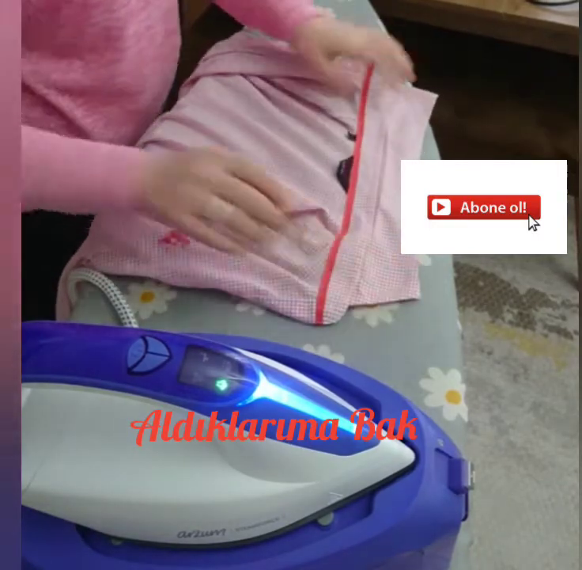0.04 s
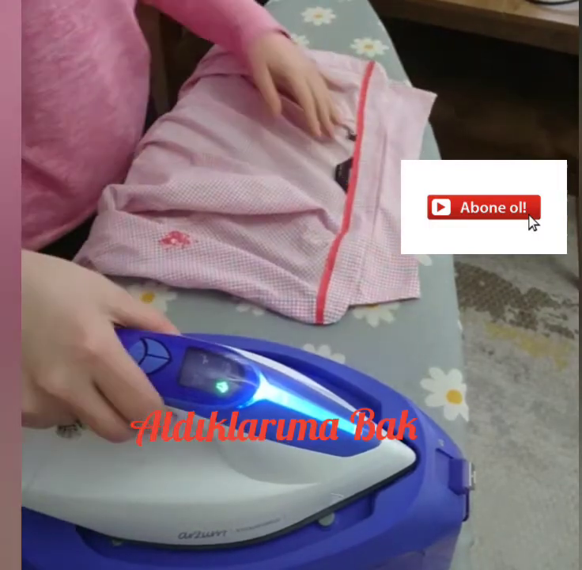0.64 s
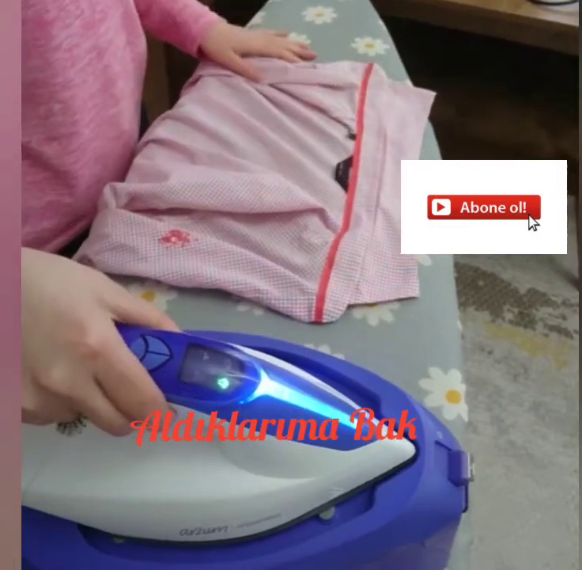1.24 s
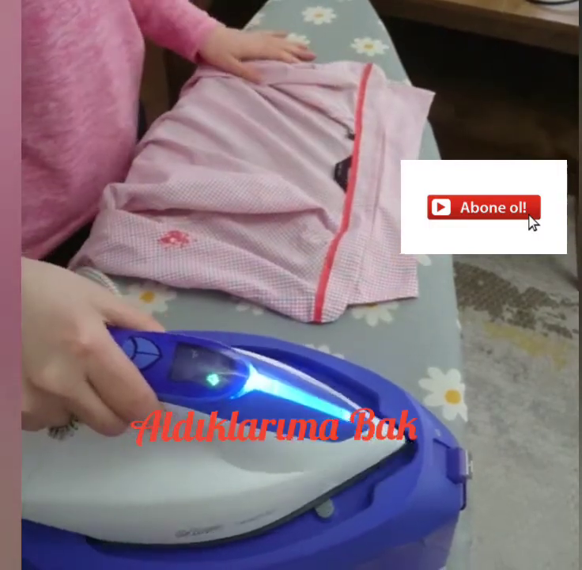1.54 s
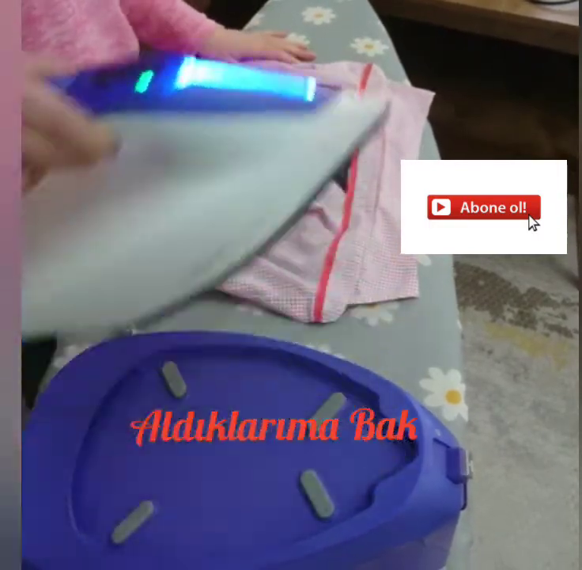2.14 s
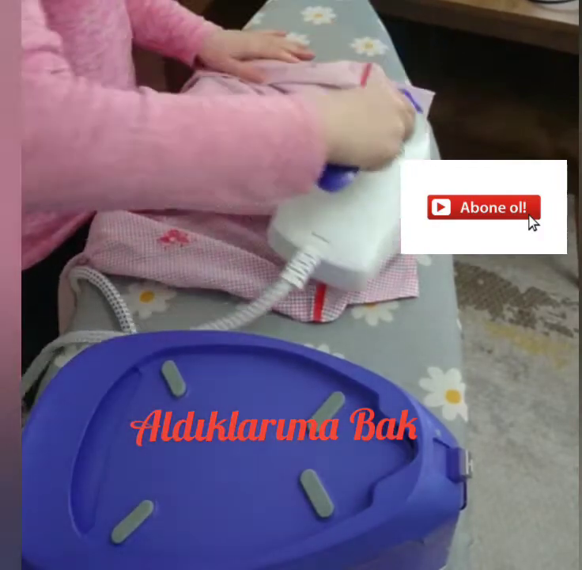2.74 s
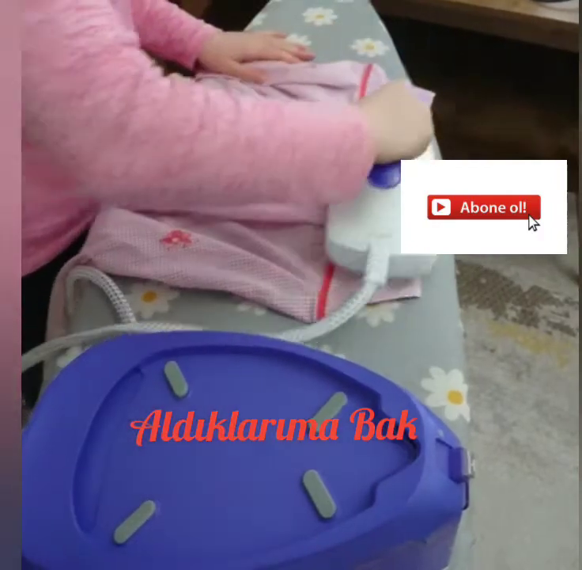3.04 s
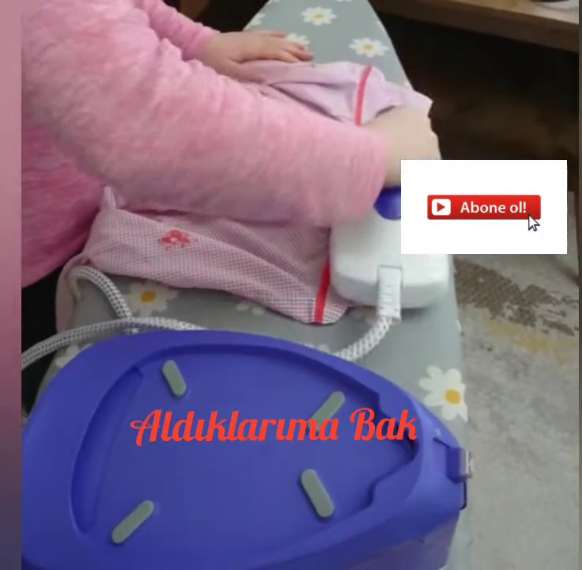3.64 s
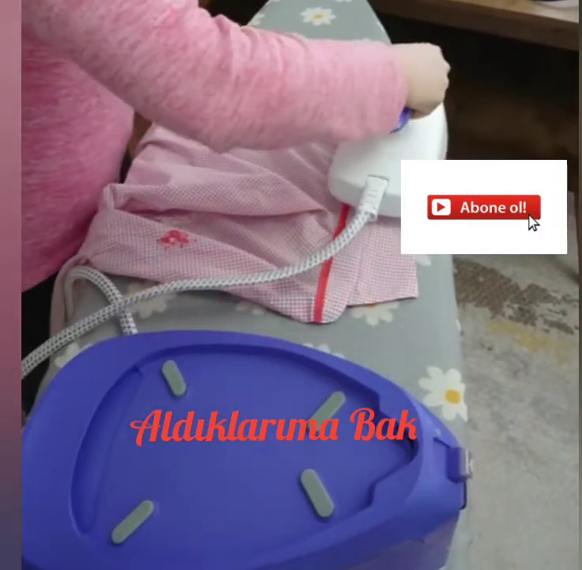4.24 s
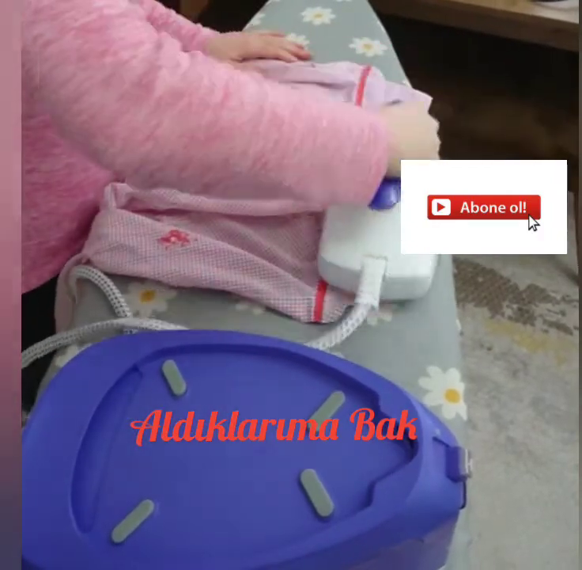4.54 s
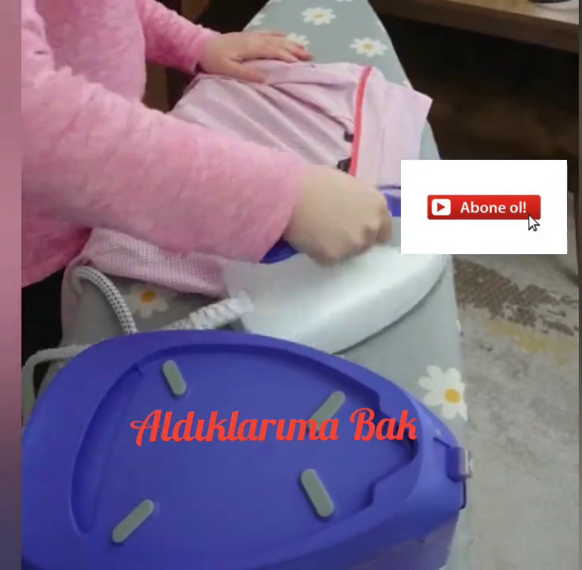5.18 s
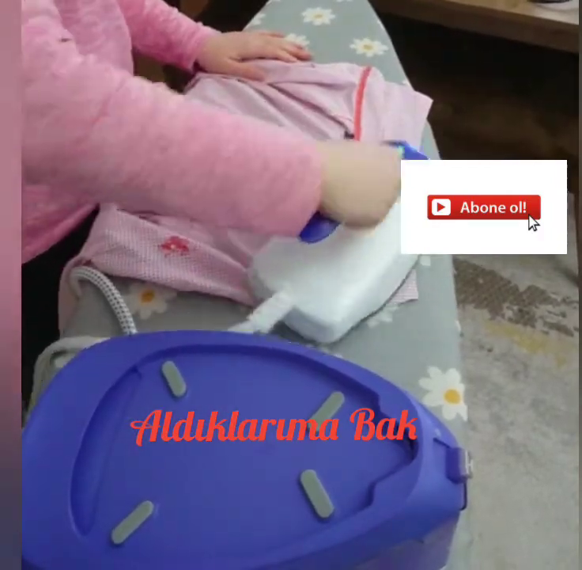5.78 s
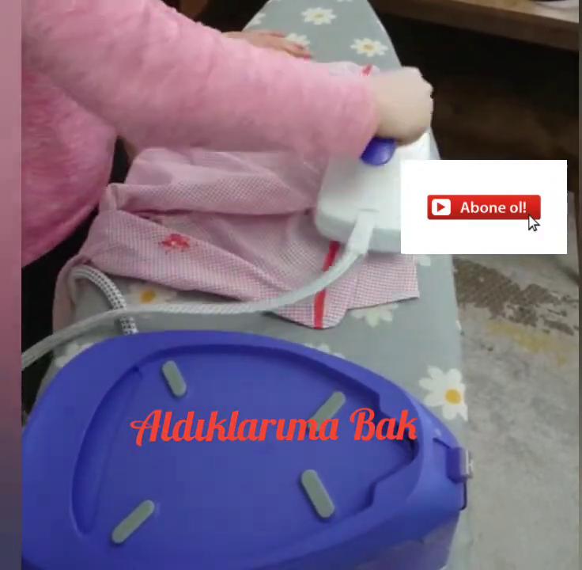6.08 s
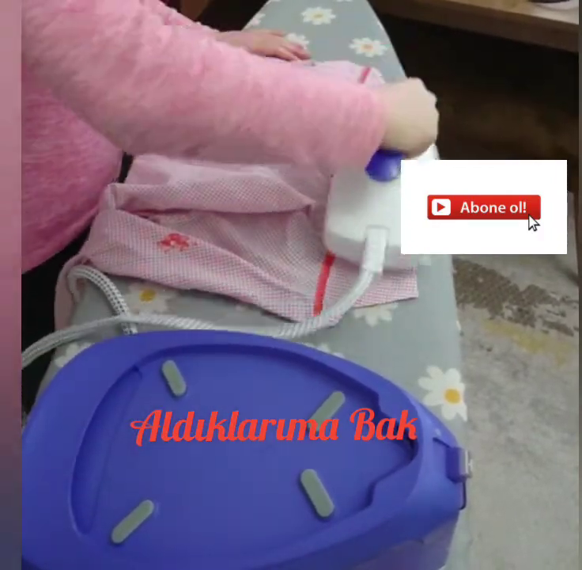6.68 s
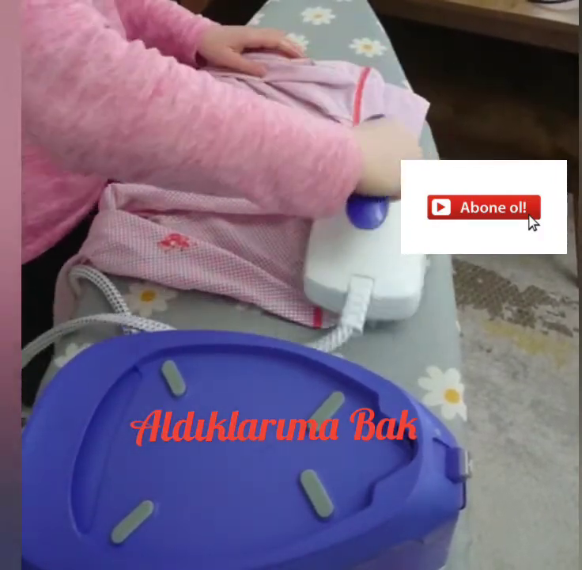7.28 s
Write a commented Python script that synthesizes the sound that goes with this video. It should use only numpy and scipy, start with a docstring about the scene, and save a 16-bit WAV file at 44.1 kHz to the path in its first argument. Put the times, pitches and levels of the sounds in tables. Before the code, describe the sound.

A steady low hush with a faint whirr fills a small room, and everything is heard from close by. From about 0.4 seconds a hand brushes cloth and grips a steam iron, making light clicks, dull taps and a hollow plastic knock. A switch snaps at 1.2 seconds. Between 1.6 and 1.9 seconds the iron jerks out of its plastic base with a short rubbery judder, the loudest moment, amid scrapes, rattles and knocks. From 2.6 seconds it glides back and forth over a shirt in soft swishes, while the ironing board rumbles faintly. Dull bumps come around 3.0, 3.7 and 4.6 seconds, mixed with small handle clicks. At 5.3 seconds the iron lands with a firm knock and a low board thump. Several light clicks follow between 6.3 and 6.7 seconds, then soft bumps near 6.8 and 7.2 seconds as the strokes continue.

```python
"""Ironing a shirt

A steam iron is gripped, worked loose from its hollow plastic base and pushed to and fro over a shirt.
Plastic knocks and small clicks sound over the swish of the soleplate; the board thumps on its legs.
A small room with a steady low hush, heard from close by through two microphone ports."""
import sys
import numpy as np
from scipy import signal
from scipy.fft import rfft, irfft, next_fast_len
from scipy.io import wavfile

SR = 44100
rng = np.random.default_rng(int(sys.argv[2]) if len(sys.argv) > 2 else 0)


def digitize_waveform(pressure):
    """Quantize a signal to 16-bit integers and store it at the path in sys.argv[1].

    Rows of a 2-D input are taken as channels; values are limited to [-1, 1].
    """
    field = np.atleast_2d(pressure).T
    bounded = np.clip(field, -1, 1)
    quanta = np.round(bounded * 32767).astype(np.int16)
    wavfile.write(sys.argv[1], SR, quanta)


N = 327079
TIME = np.arange(N) / SR
AGE = TIME[:SR * 2 // 5]   # time since an onset [s]
GIVE_S = 0.0054   # delay from a blow to the board's thump

# iron on its base: (time [s], body [dB], pitch [Hz], t60 [s], crack [dB], crack top [Hz],
# pan L-R [dB], settling [dB re body], board thump [dB])
KNOCKS = [(.622, -39.5, 430, .03, -32.5, 1050, 0, -11, -40.5),
          (.777, -49, 340, 0.033, -53, 1000, -4, 0, -39),
          (1.584, -51.5, 890, 0.046, -51, 6000, -5, -14, -35),
          (1.635, -36.5, 590, 0.034, -38.5, 1900, -0.5, -14, -51),
          (1.666, -38.5, 470, 0.072, -33.5, 1900, -1, -9, -23),
          (1.777, -52, 645, .015, -52, 1500, -3, -11, -55),
          (1.797, -40.5, 1280, 0.041, -32, 4140, -7.5, -20, -33),
          (1.803, -36, 440, 0.075, -43, 1200, -2, -5.5, -50),
          (1.872, -45.5, 620, 0.04, -42, 2000, -17, -9, -47),
          (1.888, -31.5, 794, 0.024, -28.5, 5000, -8, -11.5, -19.5),
          (1.893, -36.5, 222.6, 0.13, -54, 900, -2, -11, -57),
          (1.908, -43.5, 410, 0.042, -38, 5000, -8, -11, -65)]
# iron on the padded board: columns as KNOCKS
BUMPS = [(3.037, -62, 710, 0.012, -53, 1500, 3, -13, -42), (3.077, -57, 390, .03, -57, 1200, -3, 0, -28.5),
         (3.105, -43, 423, 0.043, -39, 990, 0, -6.5, -53),
         (3.674, -34, 507, 0.041, -36.5, 1300, -8, -3, -46),
         (3.798, -50, 344, 0.025, -48, 1100, 4, -2.5, -37), (4.603, -42, 416, 0.02, -46, 900, -2, -4, -42),
         (5.347, -25, 500, 0.034, -30, 4800, -3.5, -4, -16.5),
         (5.359, -36, 242, 0.015, -44, 700, 0, -17.5, -48),
         (6.837, -38.5, 454, 0.028, -41, 990, -2, -4.5, -56),
         (7.188, -45, 357, 0.022, -43.5, 1290, 4, -11, -46)]
# modes of the hollow plastic: (frequency [Hz], level [dB], t60 [s])
SHELL_MODES = [(220.8, 0, 0.2), (285, -2, 0.21), (377, 0, 0.025), (410.6, 0, 0.078), (463, -5.5, 0.088),
               (570, -9.5, 0.054), (609.4, -12.5, 0.29), (692, -11.5, 0.24), (764.7, -9.5, 0.21),
               (975, -19.5, 0.31), (1037, -1, 0.058), (1415, -13, 0.091), (1736, -11, 0.091),
               (3185, -8.5, 0.071)]
# hand, then soleplate, over the cloth: (start [s], length [s], peak swish [dB], peak sway [dB])
STROKES = [(0.422, 0.57, -63.5, -52), (0.9, 0.68, -71.5, -59.5), (1.564, 0.11, -55.5, -70),
           (2.587, 0.48, -64.5, -84), (2.841, 0.64, -60.5, -58.5), (3.469, 0.37, -59.5, -58),
           (3.802, 0.27, -67.5, -53), (3.883, 0.43, -64.5, -81), (4.318, 0.59, -61, -69),
           (4.803, 0.78, -61.5, -66), (5.705, 0.64, -59.5, -63.5), (6.22, 0.37, -62.5, -55),
           (6.515, 0.71, -60, -61.5), (7.172, 0.28, -62.5, -71)]


def from_db(db):
    return 10 ** (np.asarray(db) / 20)


def at_hz(points, hz):
    """Interpolate a table over log frequency."""
    table_hz, value = np.transpose(points)
    return np.interp(np.log(np.maximum(hz, 1)), np.log(table_hz), value)


def rms_one(x, first_s=None):
    """Scale to rms 1, overall or over the first first_s."""
    head = x if first_s is None else x[..., :int(first_s * SR)]
    return x / np.sqrt(np.mean(head ** 2) + 1e-20)


def fade(t60_s):
    return np.exp(-np.log(1000) * AGE / t60_s)


def swell(time_s, peak_db, rise_db_per_s, fall_db_per_s):
    """Gain that climbs to a peak at time_s, then dies away."""
    drop_db = np.maximum((time_s - TIME) * rise_db_per_s, (TIME - time_s) * fall_db_per_s)
    return from_db(peak_db - np.minimum(drop_db, 200))


def panned(x, pan_db):
    """Constant-power pan; pan_db is left minus right."""
    return x * from_db(np.array([[.5], [-.5]]) * pan_db) / np.sqrt(np.cosh(pan_db * np.log(10) / 20))


def add(track, time_s, sound):
    start = int(time_s * SR)
    track[:, start:start + sound.shape[1]] += sound[:, :N - start]


def butter(x, hz, kind):
    return signal.sosfilt(signal.butter(2, hz, kind, fs=SR, output="sos"), x)


def colour(x, spectrum):
    """Minimum-phase filter from (frequency [Hz], gain [dB]) points."""
    size = 2 * next_fast_len(x.shape[-1] // 2 + SR // 20)
    gain = from_db(at_hz(spectrum, np.arange(size // 2 + 1) * SR / size))
    cepstrum = irfft(np.log(gain))
    cepstrum[1:size // 2] *= 2
    cepstrum[size // 2 + 1:] = 0
    return irfft(rfft(x, size) * np.exp(rfft(cepstrum)))[..., :x.shape[-1]]


def noise(size, correlation):
    """Stereo white noise."""
    mid, side = rng.standard_normal((2, size))
    return np.sqrt(1 + correlation) * mid + np.sqrt(1 - correlation) * side * np.array([[1], [-1]])


def burst(spectrum, snap_t60_s, ring_t60_s, ring_db, strike_db=16):
    """Dense high plastic modes: an impulse, a fast decay and a short ring."""
    envelope = fade(snap_t60_s) + from_db(ring_db) * fade(ring_t60_s)
    strike = from_db(strike_db) * (AGE == 0)
    return colour(noise(len(AGE), correlation=0.21) * envelope + strike, spectrum)


def background():
    """Room hush, and a low whirr that reaches the two ports in opposite phase."""
    # spectra: (frequency [Hz], density [dB])
    hush_spectrum = [(20, -5), (60, -6.5), (120, -7.5), (220, -11.5), (480, 5.5), (700, -3), (850, -2.5),
                     (1000, -6.5), (2000, -10.5), (3500, -16.5), (5000, -25.5), (7000, -40), (9000, -41.5),
                     (15000, -53.5)]
    whirr_spectrum = [(200, -24.5), (300, -14), (365, 6.5), (490, -1), (560, 2), (700, -30), (1200, -50)]
    hush = from_db(-59) * rms_one(colour(noise(N, correlation=0.019), hush_spectrum))
    whirr = from_db(-58.5) * rms_one(colour(noise(N, correlation=-0.94), whirr_spectrum))
    return panned(hush, pan_db=2) + panned(whirr, pan_db=4.5)


def speed(start_s, length_s):
    """Stroke speed, 0-1: a half sine from rest to rest."""
    return np.maximum(np.sin(np.pi * np.clip((TIME - start_s) / length_s, 0, 1)), 0)


def sway():
    """The board rumbles under leaning hands, strokes and thumps; their powers add."""
    # (frequency [Hz], density [dB])
    spectrum = [(15, -48.5), (26, -20), (37, 5.5), (52, -1.5), (76, 3), (100, -8), (140, -23), (220, -15.5),
                (400, -27.5), (1000, -73.5)]
    idle_power = from_db(-65) ** 2
    stroke_power = sum((from_db(db) * speed(start_s, length_s)) ** 2
                       for start_s, length_s, _, db in STROKES)
    thump_power = sum(swell(time_s + GIVE_S, 0.52 * db - 29.5, rise_db_per_s=320, fall_db_per_s=61) ** 2
                      for time_s, *_, db in KNOCKS + BUMPS)
    rumble = rms_one(colour(noise(N, correlation=0.54), spectrum))
    return panned(np.sqrt(idle_power + stroke_power + thump_power) * rumble, pan_db=-14)


def friction(spectrum, catches_per_s, grain_db, flutter_db):
    """A rub that flutters as the contact changes, with tiny scattered catches."""
    catches = (rng.random(N) < catches_per_s / SR) * rng.exponential(1, N) * rng.standard_normal((2, N))
    knots_s = np.arange(0, TIME[-1], .03)
    flutter = from_db(flutter_db * np.interp(TIME, knots_s, rng.standard_normal(len(knots_s))))
    rub = noise(N, correlation=0.12) + from_db(grain_db) * rms_one(catches)
    return rms_one(colour(flutter * rub, spectrum))


def swish():
    """Cloth friction follows sliding speed; the soleplate glides a little through the turns."""
    # (frequency [Hz], density [dB])
    spectrum = [(120, -1.5), (250, 5.5), (450, -8), (1000, 0), (2000, -2.5), (4000, -10), (6500, -21.5),
                (8500, -19), (11000, -31.5), (15000, -32.5)]
    resting = from_db(-92)
    glide = from_db(-77) * speed(start_s=2.5, length_s=5.7)
    strokes = sum(from_db(db) * speed(start_s, length_s) ** 1.03 for start_s, length_s, db, _ in STROKES)
    rub = friction(spectrum, catches_per_s=880, grain_db=-10, flutter_db=1.87)
    return panned((resting + glide + strokes) * rub, pan_db=-2)


def click(shell_db, hz, t60_s, ring_db, snap_db):
    """One contact of a catch: a high snap, and a tick of the handle's shell ringing near hz."""
    # spectra: (frequency [Hz], density [dB])
    tick_spectrum = [(150, -31), (400, -0.5), (1000, -7), (1550, -1.5), (2300, 1), (3200, -9),
                     (4300, -10.5), (5100, -11), (6500, -17), (9000, -9.5), (15000, -15.5)]
    snap_spectrum = [(2000, -58), (6000, -27), (7700, 8), (8600, 11.5), (11000, -4), (15000, -5)]
    tick = burst(tick_spectrum, snap_t60_s=t60_s, ring_t60_s=.03, ring_db=-9)
    ring = signal.lfilter(*signal.iirpeak(hz, Q=4, fs=SR), tick)
    shell = rms_one(tick, 0.036) + from_db(ring_db) * rms_one(ring, 0.004)
    shell = butter(shell, 1.39 * hz, "low")
    snap = burst(snap_spectrum, snap_t60_s=0.0052, ring_t60_s=0.092, ring_db=-19.5)
    return from_db(shell_db) * rms_one(shell, 0.0089) + from_db(snap_db) * rms_one(snap, 0.0033)


def handle_clicks():
    """A catch snaps free brightly, travels and hits its stop, which is nearly all shell."""
    # (stop time [s], stop [dB], pitch [Hz], t60 [s], ring [dB re tick], travel [s], release snap [dB])
    catches = [(.456, -57, 4640, 0.011, 6, 0.00082, -62), (.499, -52, 2200, 0.042, -16, 0, -67),
               (.569, -63, 1900, 0.015, -6, 0.0016, -76), (0.748, -46, 2210, 0.047, -15, .012, -63.5),
               (1.185, -60.5, 4430, .0087, -3, 0, -68.5), (1.633, -50, 4260, 0.038, -16, .004, -63),
               (1.889, -41.5, 2020, .0084, -11, 0, -81), (2.2, -63.5, 5400, .0025, 6, 0, -76),
               (2.615, -63.5, 3470, .006, -9, 0.006, -83), (3.048, -52.5, 2010, 0.009, -6, 0, -76),
               (3.049, -61.5, 5240, 0.0038, 4.5, 0.025, -71), (3.105, -55.5, 3380, 0.0081, 10, 0.015, -74),
               (3.187, -62, 3000, .006, -1, 0.0052, -80), (4.498, -50, 4250, 0.0036, -2, .02, -57),
               (4.669, -45.5, 1750, 0.0022, -15.5, .009, -53), (5.347, -41, 1460, 0.0037, -6, 0.0012, -54),
               (5.637, -61.5, 1430, 0.01, 3, 0.0022, -78.5), (6.269, -53, 4600, 0.016, -8, .013, -57),
               (6.42, -55.5, 2080, 0.041, -6, .011, -55), (6.474, -56, 1440, 0.027, 7, .006, -55.5),
               (6.595, -47, 2060, 0.074, -3, .008, -54.5), (6.681, -64, 4600, .019, 4.5, 0.0034, -48)]
    out = np.zeros((2, N))
    for stop_s, *_, travel_s, db in catches:
        release = click(shell_db=db - 3, hz=4600, t60_s=0.015, ring_db=-3.5, snap_db=db)
        add(out, stop_s - travel_s, panned(release, pan_db=-6))
    for stop_s, db, hz, t60_s, ring_db, _, _ in catches:
        stop = click(db, hz, t60_s, ring_db, snap_db=db - 44)
        add(out, stop_s, panned(stop, pan_db=-2))
    return out


def blows(contacts, modes, modes_db, reach_octaves, spread_rad):
    """Each blow: a few damped cycles at its own pitch, the body's nearby modes and a crack."""
    # (frequency [Hz], density [dB])
    crack_spectrum = [(200, -7), (600, 15), (900, 6), (1400, 2), (2000, -3.5), (3200, -17.5), (5000, -17.5),
                      (8500, -31), (15000, -34)]
    out = np.zeros((2, N))
    mode_hz, mode_db, mode_t60_s = np.transpose(modes)
    rings = np.exp(2j * np.pi * mode_hz[:, None] * AGE) * fade(mode_t60_s[:, None])
    force_rise = 1 - np.exp(-AGE / 0.00063)
    for time_s, body_db, hz, t60_s, crack_db, top_hz, pan_db in contacts:
        nearness = 1 / (1 + (np.log2(mode_hz / hz) / reach_octaves) ** 2)
        strength = nearness * from_db(mode_db + modes_db + rng.normal(0, 1.5, len(modes)))
        # neighbouring modes start in opposite phase and reach the ports with different delays
        phase = np.pi * np.arange(len(modes)) + spread_rad * rng.standard_normal((2, len(modes)))
        ringing = ((strength * np.exp(1j * phase)) @ rings).imag
        punch = np.sin(2 * np.pi * hz * AGE + spread_rad * np.array([[-1], [1]])) * fade(t60_s)
        body = butter(force_rise * (punch + ringing), 0.17 * hz, "high")   # small body, little bass
        crack = burst(crack_spectrum, snap_t60_s=0.0065, ring_t60_s=0.029, ring_db=-2, strike_db=9.5)
        crack = butter(crack, top_hz, "low")   # a soft contact leaves the high modes still
        sound = from_db(body_db) * rms_one(body, 0.023) + from_db(crack_db) * rms_one(crack, 0.0089)
        add(out, time_s, panned(sound, pan_db))
    return out


def taps(crack_top_hz=824):
    """Soft dull taps, first on the plastic, later on the padded board; one contact each."""
    # (time [s], body [dB], pitch [Hz], t60 [s], pan L-R [dB])
    touches = [(0.582, -46.5, 410, 0.024, -5), (.71, -55, 405, 0.043, 3), (.812, -52.5, 320, .04, 3),
               (0.852, -46, 266, 0.043, -2), (0.884, -62, 290, 0.04, 8), (1.034, -49.5, 390, 0.027, 1),
               (1.192, -46, 356, 0.026, -5), (1.261, -53, 420, 0.025, 0), (2.101, -60.5, 268, 0.083, 0),
               (2.978, -42, 398, 0.028, 1), (3.166, -51.5, 380, 0.015, -3), (4.002, -53.5, 340, 0.08, -1),
               (5.510, -48, 330, .04, -1), (5.739, -48, 323, 0.025, -1.5), (6.363, -57, 302, 0.034, 5),
               (6.541, -50, 450, 0.024, 1)]
    contacts = [(time_s, db, hz, t60_s, db - 3, crack_top_hz, pan_db)
                for time_s, db, hz, t60_s, pan_db in touches]
    return blows(contacts, SHELL_MODES, modes_db=-16.5, reach_octaves=1, spread_rad=0.73)


def with_settling(hits, delay_s=0.00794, pitch_ratio=0.717, settle_t60_s=0.023, settle_top_hz=800):
    """The iron's weight follows each blow with a second, lower contact."""
    first, second = [], []
    for time_s, db, hz, t60_s, crack_db, top_hz, pan_db, settle_db, _ in hits:
        first.append((time_s, db, hz, t60_s, crack_db, top_hz, pan_db))
        second.append((time_s + delay_s, db + settle_db, hz * pitch_ratio, settle_t60_s,
                       db + settle_db - 7, settle_top_hz, pan_db + 4.5))
    return first + second


def knocks():
    """The iron strikes its base and rings the hollow plastic."""
    return blows(with_settling(KNOCKS), SHELL_MODES, modes_db=-6, reach_octaves=1, spread_rad=0.83)


def thumps(hz=73, t60_s=0.22, rise_s=0.0066):
    """The board bounces on its legs after each knock and bump."""
    out = np.zeros((2, N))
    bounce = np.sin(2 * np.pi * hz * AGE) * fade(t60_s) * (1 - np.exp(-AGE / rise_s))
    for time_s, *_, thump_db in KNOCKS + BUMPS:
        add(out, time_s + GIVE_S, from_db(thump_db) * panned(bounce, pan_db=-15))
    return out


def switch(time_s=1.2122):
    """A switch snaps over: a crack rings its housing, and close high modes shimmer away."""
    # spectra: (frequency [Hz], density [dB])
    crack_spectrum = [(800, -7.5), (1500, 4), (2300, 3), (2900, -6.5), (4400, -4.5), (5200, -12.5),
                      (9000, -23.5), (15000, -28)]
    shimmer_spectrum = [(1000, -23), (3000, -5), (4300, 9.5), (5800, -10.5), (7500, -11.5),
                        (15000, -25.5)]
    # (frequency [Hz], level [dB], t60 [s])
    housing_modes = [(1555, 12, 0.083), (2067, -9, 0.084), (2380, 3, 0.16), (2600, 0, 0.1),
                     (3630, -8, 0.21), (4160, -10, .18), (4200, -13, .3), (4390, -15, .18)]
    out = np.zeros((2, N))
    crack = burst(crack_spectrum, snap_t60_s=0.0096, ring_t60_s=0.036, ring_db=-8, strike_db=24)
    ring = sum(from_db(db) * fade(t60_s) * np.sin(2 * np.pi * hz * AGE)
               for hz, db, t60_s in housing_modes)
    shimmer = fade(t60_s=0.46) * rms_one(colour(noise(len(AGE), correlation=0.2), shimmer_spectrum))
    snap = from_db(-35) * rms_one(crack, 0.0059) + from_db(-55) * rms_one(ring, 0.024)
    add(out, time_s, snap + from_db(-59) * shimmer)
    return out


def drag():
    """The iron scrapes out of its seat in jerks."""
    # (fastest moment [s], level [dB])
    jerks = [(1.592, -59), (1.645, -45), (1.671, -41.5), (1.805, -45), (1.891, -37)]
    # (frequency [Hz], density [dB])
    spectrum = [(100, 12), (220, 8), (450, 9.5), (1000, 5.5), (2000, -9), (4000, -22.5), (8500, -34.5),
                (15000, -39)]
    gain = sum(swell(time_s, db, rise_db_per_s=578, fall_db_per_s=165) for time_s, db in jerks)
    return panned(gain * friction(spectrum, catches_per_s=340, grain_db=-1, flutter_db=1.5), pan_db=-7.5)


def rattles(contacts_per_s=420):
    """Loose parts chatter as the iron comes free: dying runs of tiny uneven contacts."""
    # (time [s], level [dB], t60 [s])
    runs = [(1.633, -61, 0.17), (1.665, -59, 0.038), (1.693, -49, 0.03), (1.80, -49, 0.24),
            (1.893, -50, 0.17), (1.908, -50, .06)]
    # (frequency [Hz], density [dB])
    spectrum = [(400, -42), (1050, 6.5), (1800, -6), (2200, 0), (3300, -2), (4000, -18), (15000, -46)]
    out = np.zeros((2, N))
    for time_s, db, t60_s in runs:
        contacts = (rng.random(len(AGE)) < contacts_per_s / SR) * noise(len(AGE), correlation=0.28)
        add(out, time_s, from_db(db) * fade(t60_s) * rms_one(colour(contacts, spectrum)))
    return out


def judders(rise_s=0.0038, sag_octaves_per_s=6.5):
    """The rubber rests let go of the soleplate: each slip lasts a few cycles and sags in pitch."""
    # (time [s], level [dB], pitch [Hz], pan L-R [dB])
    slips = [(1.6395, -17.5, 350, -1), (1.655, -17, 282, 2), (1.6688, -15.5, 289, -1.5)]
    out = np.zeros((2, N))
    envelope = (AGE / rise_s * np.exp(1 - AGE / rise_s)) ** 2
    for time_s, db, hz, pan_db in slips:
        cycles = np.cumsum(hz * 2 ** (-sag_octaves_per_s * AGE)) / SR
        add(out, time_s, panned(from_db(db) * envelope * np.sin(2 * np.pi * cycles), pan_db))
    return out


def bumps():
    """The iron rings the board's padded top as it lands or a stroke turns."""
    # (frequency [Hz], level [dB], t60 [s])
    board_modes = [(240.6, -0.5, 0.086), (330, -5, 0.036), (399.6, 4, 0.081), (473, 0, .13),
                   (547, -4, 0.18), (621, -6.5, 0.11), (706, -11.5, 0.16), (960, -22, .07), (1150, -3, .06),
                   (1447, -1, 0.072)]
    return blows(with_settling(BUMPS), board_modes, modes_db=-17, reach_octaves=0.92, spread_rad=0.75)


def rasps():
    """Dragged cloth and cord slip unevenly: a narrow noise band gliding in pitch."""
    # (start [s], length [s], from [Hz], to [Hz], spread [Hz], level [dB])
    slips = [(3.546, 0.15, 1597, 2100, 150, -63.5), (5.98, .13, 319.4, 184, 24.8, -59.5)]
    out = np.zeros((2, N))
    for start_s, length_s, from_hz, to_hz, spread_hz, db in slips:
        progress = np.clip(AGE / length_s, 0, 1)
        cycles = np.cumsum(from_hz + (to_hz - from_hz) * progress) / SR
        uneven = butter(noise(len(AGE), correlation=0.6), spread_hz, "low")
        band = rms_one(uneven * np.sin(2 * np.pi * cycles))
        add(out, start_s, from_db(db) * np.sin(np.pi * progress) * band)
    return panned(out, pan_db=-2)


def room(x, wet_db, first_echo_s=0.0016):
    """Add a short diffuse tail that builds up after the first wall echo."""
    # (frequency [Hz], t60 [s])
    decay_times = [(100, 0.27), (400, 0.24), (2000, 0.23), (6000, 0.29), (15000, 0.27)]
    white = rng.standard_normal((2, len(AGE)))
    edges_hz = np.geomspace(140, 17000, 8)
    tail = sum(butter(white, [low, high], "band") * fade(at_hz(decay_times, np.sqrt(low * high)))
               for low, high in zip(edges_hz, edges_hz[1:]))
    build_up = np.clip(AGE / first_echo_s - 1, 0, 1)
    tail = rms_one(tail * build_up) / np.sqrt(len(AGE))
    return x + from_db(wet_db) * signal.fftconvolve(x, tail, axes=1)[:, :N]


def scene():
    """Knocks and clicks in the room, over dry rubbing, thumps and the background."""
    knocks_and_taps = knocks() + taps()
    board = bumps()
    motion = swish() + drag() + sway()
    hits = room(knocks_and_taps + rattles(), wet_db=-6.5) + room(board, wet_db=-5)
    hits += room(handle_clicks(), wet_db=1) + room(switch(), wet_db=-1.5) + room(judders(), wet_db=-4.5)
    return hits + thumps() + motion + rasps() + background()


def record(dry):
    """The microphone ports colour the treble; the deepest bass and the top are cut."""
    # port response: (frequency [Hz], left [dB], right [dB])
    ports = [(736, 0.5, 0.5), (1265, -3, -2), (2550, -5.5, -1.5), (6050, -3, 2), (7470, -6.5, -0.5),
             (8080, -7, 6), (8780, 1, 8), (9430, 7.5, -1), (9420, -4, -20), (12900, -9, -12.5),
             (14200, -1, -2.5), (15260, -3, -3)]
    hz, left_db, right_db = np.transpose(ports)
    heard = np.array([colour(channel, np.column_stack([hz, db]))
                      for channel, db in zip(dry, (left_db, right_db))])
    heard = butter(heard, hz=27, kind="high")
    top_hz = 15900
    return signal.sosfilt(signal.ellip(10, .3, 80, top_hz, fs=SR, output="sos"), heard)


dry = scene()
out = record(dry)
digitize_waveform(out)
```